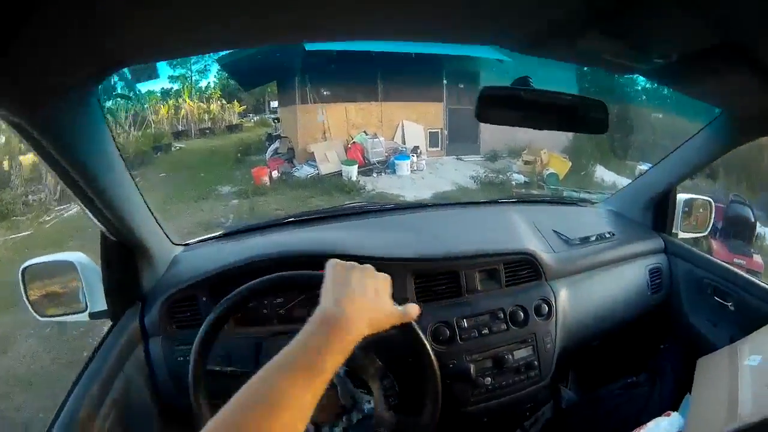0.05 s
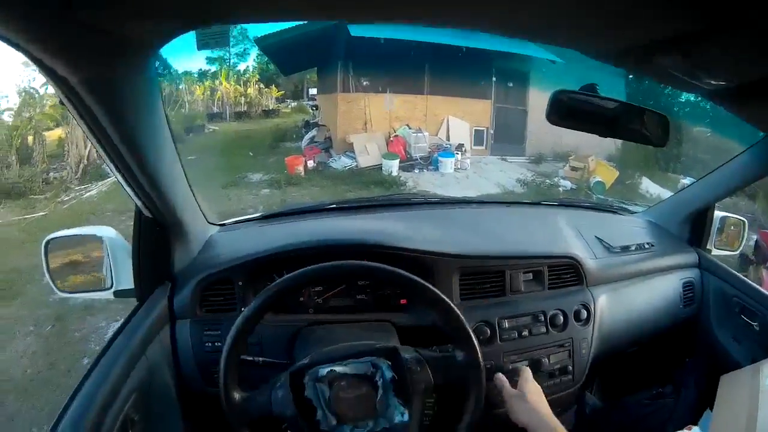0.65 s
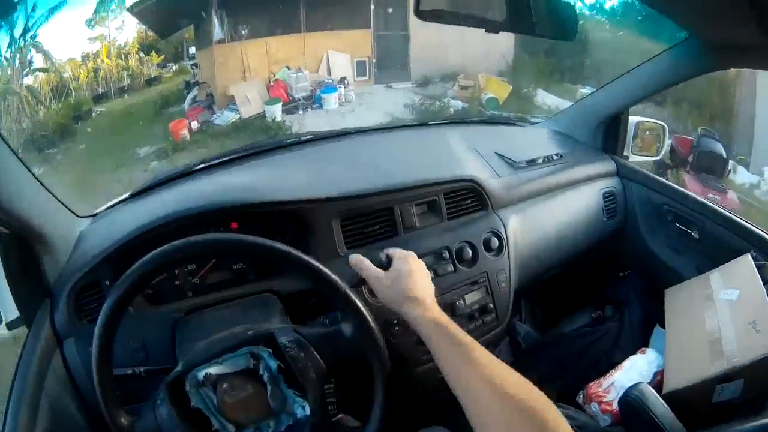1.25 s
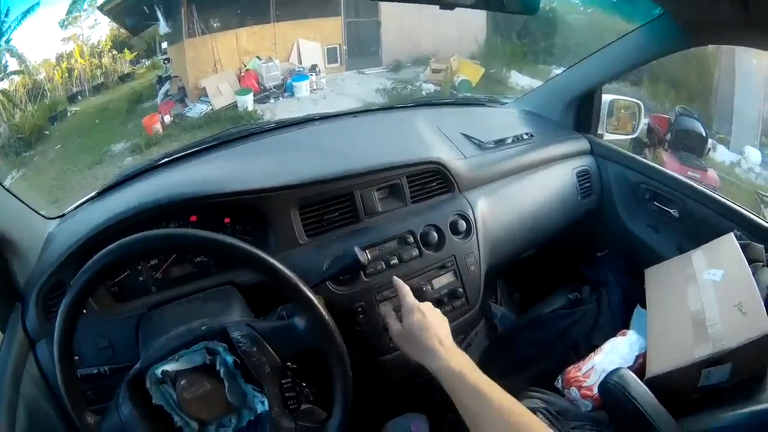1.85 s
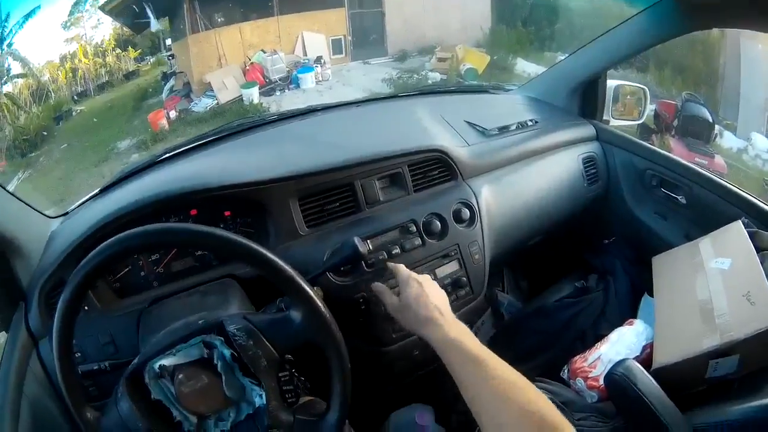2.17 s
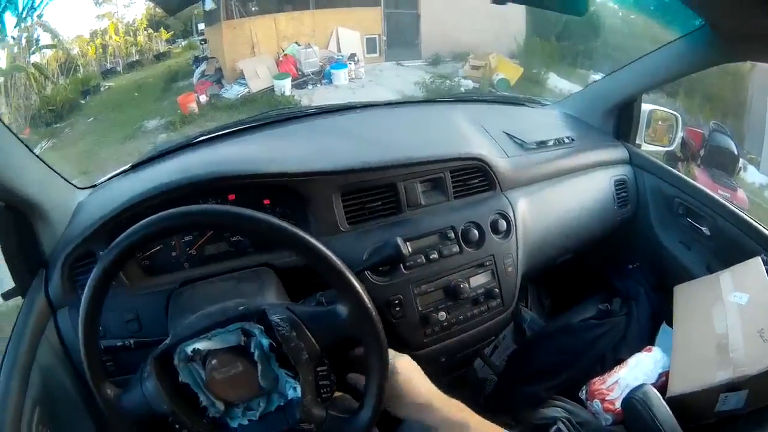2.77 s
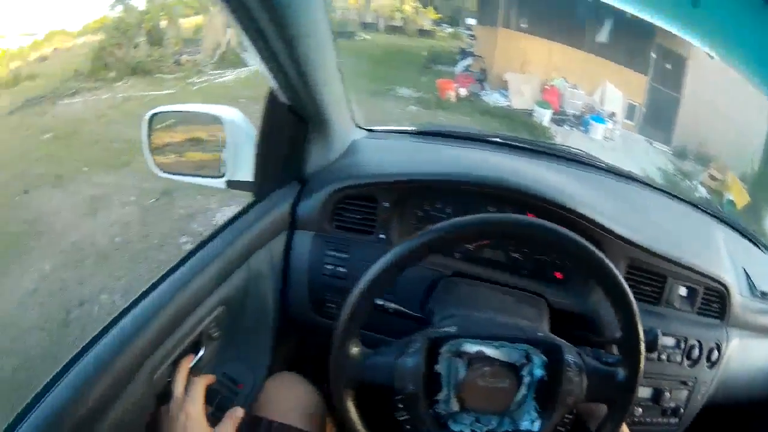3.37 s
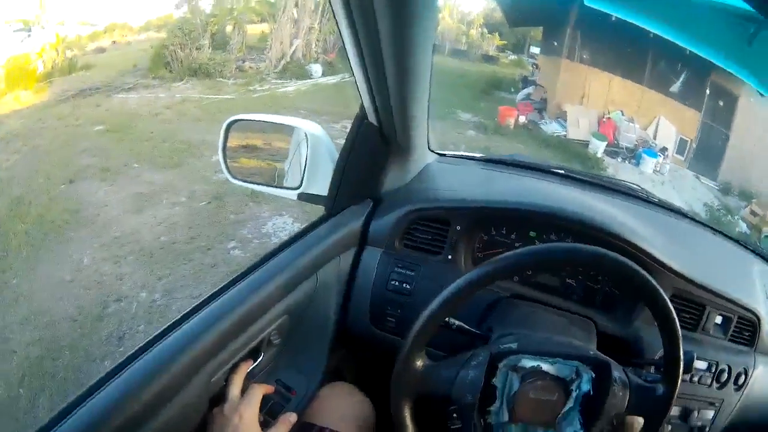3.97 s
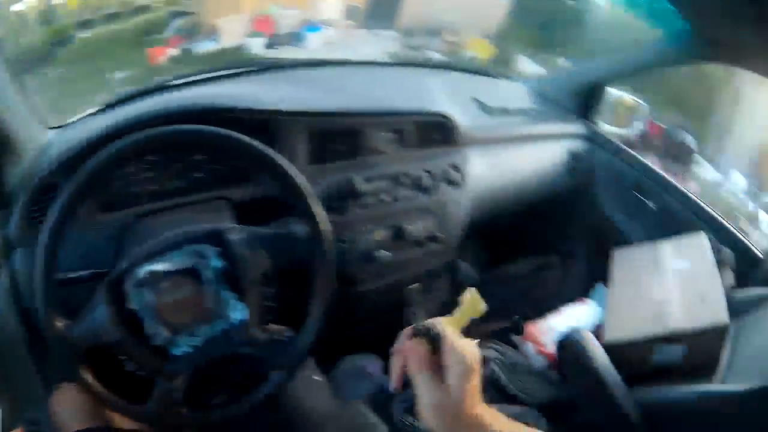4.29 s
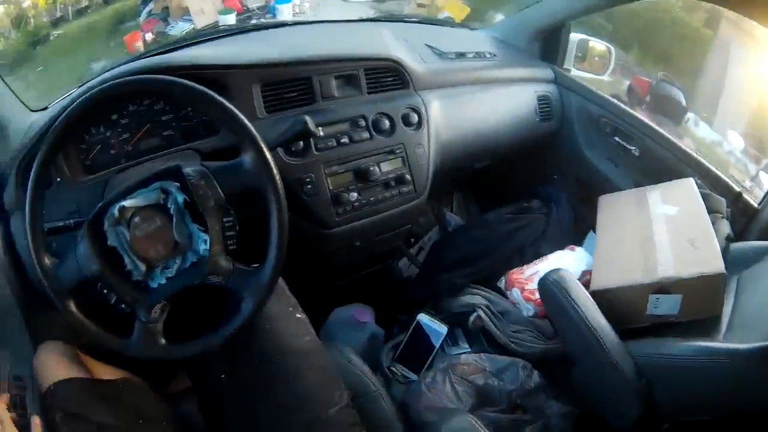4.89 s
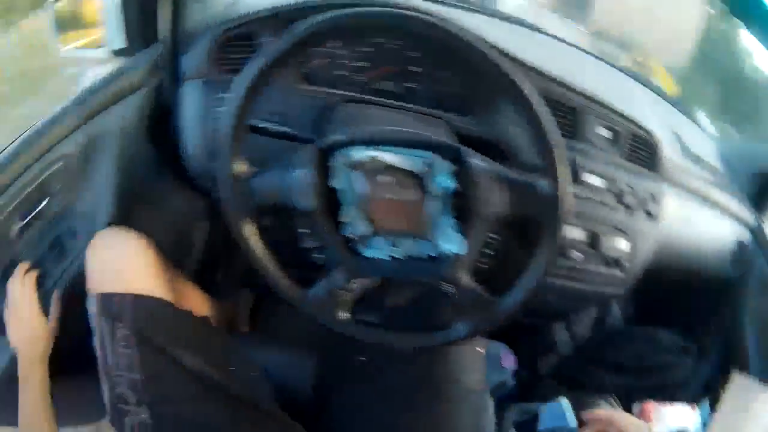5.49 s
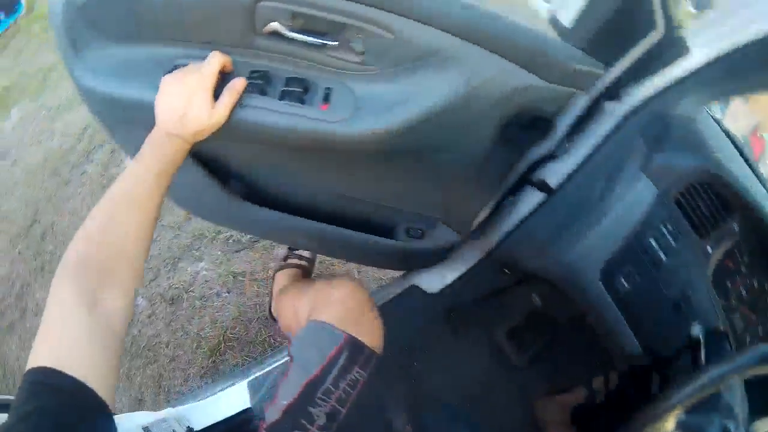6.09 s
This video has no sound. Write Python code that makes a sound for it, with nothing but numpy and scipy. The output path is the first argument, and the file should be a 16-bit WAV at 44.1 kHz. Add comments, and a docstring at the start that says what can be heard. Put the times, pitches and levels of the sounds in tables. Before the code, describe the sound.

A low engine idle and soft vent air fill a car cabin, with the microphone near the driver. The gear lever clunks through its notches, then switches click and the fan dies down. The key clicks round in the lock and the engine winds down. A bunch of keys clinks and jingles, the door latch lets go with a low thump, and clothes rustle against the seat.

```python
"""Parking and leaving a car

From the driver's seat, a six-cylinder engine booms at idle and clothes rub as the driver moves.
The gear lever clacks into park, the fan is switched off, the ignition key clicks round and the engine
shudders to a stop. Keys jangle against each other as they are pulled out, then the door unlatches
and opens. A quiet yard murmurs underneath."""
import sys
import numpy as np
from scipy import signal
from scipy.fft import rfft, irfft, next_fast_len
from scipy.io import wavfile

SR = 44100
rng = np.random.default_rng(int(sys.argv[2]) if len(sys.argv) > 2 else 0)


def log_audio(samples):
    """Write samples as a 16-bit WAV file to the path given in sys.argv[1]."""
    # one column per channel
    frames = np.atleast_2d(samples).T
    # limit to full scale, then quantise
    limited = np.clip(frames, -1, 1)
    pcm = np.round(limited * 32767).astype(np.int16)
    wavfile.write(sys.argv[1], SR, pcm)


N = 270774
TIME = np.arange(N) / SR

# Levels in all tables are relative: the code that uses them may turn them up or down.
# tone of the dashboard and door panels: pitch_hz, level_db
TRIM_TONE = [(60, -9), (200, -18.5), (330, -5), (560, -13), (900, -2), (1250, -6), (2000, 1.5),
             (3600, -19.5), (7600, -17.5), (10500, -22), (15000, -30)]
# tone of clinking keys as heard in the cabin, with a resonance near 2 kHz: pitch_hz, level_db
KEY_TONE = [(700, -31), (1300, -7), (1700, -8.5), (1970, 7.5), (2400, -9), (3100, 2), (4000, -4.5),
            (5000, 0), (7000, 1.5), (9600, -0.5), (13300, -8), (15000, -21)]


def from_db(db):
    """Turn decibels into a number to multiply by."""
    return 10 ** (np.asarray(db) / 20)


def rms_one(x):
    """Scale a sound so its average strength (rms) is 1."""
    return x / np.sqrt(np.mean(x ** 2) + 1e-20)


def add(out, start_s, sound):
    """Mix a sound in at its start time."""
    at = int(np.clip(round(start_s * SR), 0, N - 1))
    out[at:at + len(sound)] += sound[:N - at]


def band(x, low_hz, high_hz):
    """Keep the pitches between two limits."""
    return signal.sosfilt(signal.butter(2, [low_hz, high_hz], "band", fs=SR, output="sos"), x)


def colour(x, tone):
    """Make each pitch louder or softer, following a tone table."""
    size = 2 * next_fast_len(len(x) // 2 + 2048)
    hz, db = np.transpose(tone)
    grid_hz = np.maximum(np.arange(size // 2 + 1) * SR / size, 1)
    gains = from_db(np.interp(np.log(grid_hz), np.log(hz), db))
    # fold the filter so that it never rings ahead of the sound
    cepstrum = irfft(np.log(gains))
    cepstrum[1:size // 2] *= 2
    cepstrum[size // 2 + 1:] = 0
    return irfft(rfft(x, size) * np.exp(rfft(cepstrum)))[:len(x)]


def drift(per_s):
    """A random wobble of about 1 either way, changing per_s times a second."""
    knots = rng.standard_normal(4096)
    return np.interp(TIME * per_s, np.arange(len(knots)), knots)


def noise(tone, flutter_db):
    """Noise with a given tone and a fluttering level."""
    return rms_one(colour(rng.standard_normal(N), tone) * from_db(flutter_db * drift(30)))


def ring(clicks, hz, fade_s):
    """Each click starts a pure note that falls 60 dB in fade_s."""
    decay, step = from_db(-60 / (fade_s * SR)), 2 * np.pi * hz / SR
    return signal.lfilter([0, np.sin(step)], [1, -2 * decay * np.cos(step), decay ** 2], clicks + 1e-18)


def grains(per_s, spread_db):
    """Tiny random contacts of uneven size."""
    sizes = from_db(spread_db * np.minimum(rng.exponential(1, N), 3)) * rng.choice([-1, 1], N)
    return sizes * (rng.random(N) < per_s / SR)


def swells(rows, rise_s, fall_s):
    """Loudness of movements: each builds up to its start time, holds and dies away."""
    power = 0
    for start_s, length_s, db in rows:
        early = np.maximum(start_s - TIME, 0) / rise_s
        late = np.maximum(TIME - start_s - length_s, 0) / fall_s
        power += (from_db(db) * np.exp(-np.minimum(early + late, 20))) ** 2
    return np.sqrt(power)


def blows(rows, tone, gain_db, fade_s, tail_db, rough_db, rise_s):
    """Struck parts chatter, then fade in the cabin: a low thud, a middle knock and a high snap."""
    out, t = np.zeros(N), TIME[:SR // 3]
    for start_s, thud_db, knock_db, snap_db, chatter_s in rows:
        rough = from_db(rough_db * np.interp(t * 900, np.arange(512), rng.standard_normal(512)))
        dying = from_db(-60 * np.maximum(t - chatter_s, 0) / fade_s) + from_db(tail_db - 60 * t / 0.27)
        onset = 1 - np.exp(-t / rise_s)
        strike = colour(rng.standard_normal(len(t)) * rough * dying * onset, tone)
        # flipping the middle band lets the three join without a gap
        bands = [(35, 500, thud_db, 1), (500, 3000, knock_db, -1), (3000, 16000, snap_db, 1)]
        for low_hz, high_hz, db, sign in bands:
            part = sign * band(strike, low_hz, high_hz)
            add(out, start_s, from_db(db + gain_db) * part / np.linalg.norm(part) * np.sqrt(0.011 * SR))
    return out


def engine():
    """The cylinders' firing booms in the cabin; as the engine slows it rocks on its mounts."""
    # notes of the boom: multiple_of_firing_rate, level_db
    notes = [(2 / 3, 0), (4 / 3, -9.5), (2, -1.2), (3, -3), (4, -1.8)]
    # tone of the rumble: pitch_hz, level_db
    rumble_tone = [(12, -19), (25, 6.5), (55, -5), (160, -2), (200, -8.5), (400, -15), (650, -20.5),
                   (1200, -50)]
    idle_hz, mounts_hz = 39.25, 13   # firings a second at idle; rate of the last shudders
    park_s, key_off_s, standstill_s = 1.92, 3.85, 4.68
    idle_shake_db, shudder_db, in_gear_db, in_park_db = -49, -32, -42, -48
    running = np.exp(-np.maximum(TIME - key_off_s, 0) / 0.16)
    turning = np.exp(-np.maximum(TIME - standstill_s, 0) / 0.022)
    load = np.exp(-np.maximum(TIME - park_s, 0) / 0.13)   # in park the load comes off
    firing_hz = mounts_hz + (idle_hz - mounts_hz) * running
    phase = 2 * np.pi * np.cumsum(firing_hz * (1 + 0.015 * drift(14))) / SR
    boom = sum(from_db(db + 2.3 * drift(22)) * np.sin(multiple * phase + rng.uniform(0, 2 * np.pi))
               for multiple, db in notes)
    shake = np.sin(phase) + from_db(-20.5) * np.sin(2 * phase) + from_db(-22) * np.sin(4 * phase)
    rumble = noise(rumble_tone, flutter_db=4) * (1 + 0.036 * np.sin(phase))
    shake_db = shudder_db + (idle_shake_db - shudder_db) * running ** 2 + drift(12)
    rumble_db = in_park_db + (in_gear_db - in_park_db) * load
    drone = from_db(-48) * rms_one(boom) + from_db(rumble_db) * rumble
    return running * drone + turning * from_db(shake_db) * rms_one(shake)


def fan():
    """Air from the vents drops to a faint hiss once the fan is switched off."""
    # loudness of the air: time_s, level_db
    airflow = [(0, -59), (2.25, -47.5), (2.55, -62.5), (3.6, -69), (4.0, -62.5)]
    # tone of the air: pitch_hz, level_db
    air_tone = [(200, 0.5), (400, -3), (1100, -7), (1500, -6.5), (2700, -30), (4200, -35.5), (12000, -50.5)]
    time_s, level_db = np.transpose(airflow)
    return from_db(np.interp(TIME, time_s, level_db)) * noise(air_tone, flutter_db=3)


def yard():
    """A faint outdoor murmur, there all the time."""
    # tone of the yard: pitch_hz, level_db
    yard_tone = [(30, -2.5), (100, -17.5), (300, -33.5), (2000, -17.5), (3500, -33.5), (15000, -35)]
    return from_db(-59) * noise(yard_tone, flutter_db=2)


def driver():
    """Hands, clothes and seat rub in clumps of tiny slips; the seat rumbles as weight shifts."""
    # hands slide over the wheel: start_s, length_s, level_db
    strokes = [(.08, 0.11, -61), (.32, 0.13, -59.5), (.64, 0.079, -62.5)]
    # reaching for lever, key and door: start_s, length_s, rubbing_db, rumble_db
    moves = [(1.131, 0.27, -45.5, -35.5), (1.49, 0.28, -49, -38.5), (2.734, 0.3, -56, -43.5),
             (3.742, 0.15, -41, -67), (4.076, 0.02, -40.5, -50), (4.243, .3, -55, -49.5),
             (4.7, 0.34, -33.5, -47), (5.088, 0.12, -50, -61), (5.343, 0.018, -45.5, -66),
             (5.513, 0.074, -53.5, -81), (5.853, 0.22, -50.5, -62.5)]
    # tone of the sliding hands: pitch_hz, level_db
    hand_tone = [(400, -24), (700, -4), (1960, -0.5), (3060, -13.5), (4800, -15), (9500, -21.5),
                 (15000, -33)]
    # tone of clothes on the seat: pitch_hz, level_db
    seat_tone = [(60, -2.5), (300, -13), (900, -11), (1800, -6.5), (2700, -16), (4500, -22.5),
                 (10000, -32.5)]
    # tone of seat and floor under the body: pitch_hz, level_db
    weight_tone = [(15, -3), (28, 4.5), (60, -3), (130, -4.5), (190, -10), (400, -14.5), (650, -17.5),
                   (1200, -48)]
    slips = grains(per_s=5000, spread_db=3) * from_db(2 * drift(70))
    hands = from_db(8.5) * swells(strokes, rise_s=0.23, fall_s=0.023) * rms_one(colour(slips, hand_tone))
    rise_s, fall_s = 0.052, 0.047
    rubbing = swells([(start, length, db) for start, length, db, _ in moves], rise_s, fall_s)
    weight = swells([(start, length, db) for start, length, _, db in moves], rise_s, fall_s)
    return hands + rubbing * rms_one(colour(slips, seat_tone)) + weight * noise(weight_tone, flutter_db=1)


def dashboard():
    """The controls clack, and one button gives a single short tick."""
    # clacks of the controls: start_s, thud_db, knock_db, snap_db, chatter_s
    switches = [(.515, -55, -48.5, -47.5, .012), (1.743, -46, -109, -38, 0.0025),
                (2.235, -41.5, -47.5, -43.5, 0.0044), (2.33, -50, -47.5, -59, 0.013),
                (2.86, -41, -58, -37, 0.012), (2.919, -46, -72, -46.5, 0.0048),
                (2.971, -25.5, -30.5, -30.5, 0.0073), (3.101, -53, -59, -50.5, .01),
                (3.222, -49, -51.5, -58, 0.0086)]
    press = np.zeros(N)
    add(press, 0.7793, [1.0])
    tick = from_db(-17.5) * ring(press, hz=2330, fade_s=0.0094)
    tick -= from_db(-18.5) * ring(press, hz=1630, fade_s=0.0077)
    clacks = blows(switches, TRIM_TONE, gain_db=-2, fade_s=0.096, tail_db=-33, rough_db=-3, rise_s=0.0009)
    return clacks + cabin(tick, echo_db=-11, fade_s=0.089)


def cabin(x, echo_db, fade_s):
    """Nearby glass and panels add many echoes that die quickly."""
    t = TIME[:SR // 4]
    echoes = rng.standard_normal(len(t)) * from_db(-60 * t / fade_s) * (t > 0.001)
    return x + from_db(echo_db) * signal.fftconvolve(x, echoes / np.linalg.norm(echoes))[:N]


def gear_change():
    """The lever squeaks and drops through its notches; the car rocks as the drive lets go."""
    # the lever hits each notch: start_s, thud_db, knock_db, snap_db, chatter_s
    notches = [(1.295, -20.5, -23.5, -23.5, 0.013), (1.343, -24.5, -18.5, -23.5, 0.015),
               (1.39, -31, -35, -51, .0049), (1.427, -33, -17.5, -19.5, 0.016),
               (1.437, -20.5, -21.5, -30, 0.024), (1.608, -33, -26.5, -40, 0.0039),
               (1.642, -33.5, -32, -44.5, 0.0093)]
    # tone of the lever's housing: pitch_hz, level_db
    housing = [(41, -7), (70, -3), (150, 0.5), (215, -10), (275, 2.5), (578, -4.5), (632, 2), (740, -3),
               (1590, -2.5), (2080, -2), (3810, -21), (7650, -18), (10500, -22.5), (15000, -43)]
    # the car's body rocks: start_s, length_s, level_db
    rocks = [(1.13, 0.05, -27), (1.5, 0.3, -31)]
    squeak_hz = np.interp(TIME, [1.11, 1.17], [835, 875]) * (1 + 0.053 * drift(250))
    pressure = np.interp(TIME, [1.10, 1.118, 1.15, 1.172], [0.015, 0.63, 0.46, 0.0044])
    pressure *= from_db(2 * drift(250))
    squeak = from_db(-27.5) * pressure * np.sin(2 * np.pi * np.cumsum(squeak_hz) / SR)
    rock_hz = 19 + 4 * drift(16)
    rocking = swells(rocks, rise_s=0.05, fall_s=0.059) * np.sin(2 * np.pi * np.cumsum(rock_hz) / SR)
    clacks = blows(notches, housing, gain_db=-4.5, fade_s=0.061, tail_db=-15, rough_db=0.5, rise_s=0.0008)
    return squeak + rocking + clacks


def key_touch():
    """Two keys meet: a clack and a short ring, muffled by the hand and never quite alike."""
    # notes a key rings at: pitch_hz, level_db
    notes = [(4800, 7.5), (5800, -17), (7090, 8.5), (8400, -1.5), (9180, 5.5), (9620, 9.5), (10400, 3),
             (12200, 10.5), (13000, 3.5)]
    t = TIME[:SR // 8]
    picked = np.array(notes)[rng.choice(len(notes), size=8)]
    hz, db = picked.T[:, :, None]
    hz = hz * rng.uniform(0.93, 1.07, hz.shape)
    fade_s = rng.uniform(0.025, 0.1, hz.shape)
    rings = np.sum(from_db(db - 60 * t / fade_s) * np.sin(2 * np.pi * hz * t), axis=0)
    clack = colour(rng.standard_normal(len(t)) * from_db(-60 * t / 0.052), KEY_TONE)
    return (clack + from_db(-12.5) * rings) * (1 - np.exp(-t / 0.0025))


def keys():
    """Keys slide over one another, tick as they are shaken and now and then clink hard."""
    # shakes of the bunch: start_s, length_s, level_db
    shakes = [(3.555, .01, -61.5), (3.62, 0.0092, -57.5), (3.8, 0.087, -40), (3.99, 0.052, -49),
              (4.06, 0.013, -38), (4.17, 0.024, -41.5), (4.24, 0.01, -39.5), (4.32, .01, -47),
              (4.39, 0.073, -39), (4.515, 0.017, -38), (4.62, 0.33, -39.5), (5.13, 0.031, -44),
              (5.29, 0.081, -41.5), (5.46, 0.0095, -54.5), (5.535, 0.019, -49.5), (5.61, 0.016, -54),
              (5.72, 0.0077, -54), (5.84, 0.13, -34.5), (6.03, 0.054, -37)]
    # the hardest clinks: start_s, level_db
    clinks = [(1.1834, -28), (1.884, -51.5), (3.702, -33), (3.9843, -27.5), (4.3773, -26), (4.397, -21),
              (4.4053, -14), (4.5923, -25.5), (4.6113, -17), (4.6906, -23), (4.7224, -20.5), (4.7453, -23),
              (4.801, -21), (4.8569, -26.5), (4.9222, -25.5), (5.1267, -30), (5.2851, -32), (5.787, -35),
              (5.8297, -34), (5.8572, -26.5), (5.9207, -24), (5.9405, -19), (6.0642, -38)]
    touches_per_s, grabbed_s = 110, 3.5
    shaking = swells(shakes, rise_s=0.02, fall_s=0.03)
    sliding = colour(grains(per_s=1500, spread_db=5), KEY_TONE) * from_db(3 * drift(60))
    out = from_db(-6) * shaking * rms_one(sliding)
    for at in np.flatnonzero((rng.random(N) < touches_per_s / SR) & (TIME > grabbed_s)):
        add(out, at / SR, from_db(3.5 + 5.2 * rng.uniform(-1.5, 1)) * shaking[at] * key_touch())
    for start_s, db in clinks:
        add(out, start_s, from_db(db - 2.5) * key_touch())
    return out


def panel_bumps():
    """The cabin's panels give dull knocks when bumped."""
    # the bumps: start_s, thud_db, knock_db, snap_db, chatter_s
    bumps = [(2.774, -26.5, -46, -49.5, .0083), (2.862, -30.5, -51, -48, 0.031),
             (4.762, -16.5, -24.5, -44, .016), (6.091, -40, -29.5, -74, 0.004)]
    # tone of a bumped panel: pitch_hz, level_db
    panel_tone = [(40, 17.5), (130, 10), (190, 1.5), (270, 7.5), (550, -1), (2000, -14.5), (4600, -30),
                  (12000, -31)]
    return blows(bumps, panel_tone, gain_db=0, fade_s=0.09, tail_db=-6.5, rough_db=-1.5, rise_s=0.001)


def ignition():
    """The lock clicks as the key turns it."""
    # clicks of the lock: start_s, thud_db, knock_db, snap_db, chatter_s
    clicks = [(3.733, -42, -20, -14.5, .0059), (3.858, -29, -18.5, -12, 0.0065),
              (4.108, -30.5, -21.5, -14, 0.0069)]
    # tone of the lock: pitch_hz, level_db
    lock_tone = [(120, -78), (200, -10.5), (298, -24), (485, -12), (896, -10), (1130, -0.5), (1330, -5.5),
                 (2020, 7.5), (2510, -7.5), (3470, -9.5), (5170, -6), (5660, -7.5), (8260, -4.5),
                 (12700, -14.5), (15000, -31)]
    return blows(clicks, lock_tone, gain_db=-1.5, fade_s=0.063, tail_db=-28.5, rough_db=-3, rise_s=0.0034)


def door():
    """The latch lets go and the seal releases a low puff of air."""
    # clacks of handle and latch: start_s, thud_db, knock_db, snap_db, chatter_s
    clacks = [(4.654, -34, -34, -55, 0.011), (4.796, -36, -22, -44, 0.0068),
              (4.935, -22, -25.5, -63, 0.013), (5.010, -37, -29, -24, 0.015),
              (5.0285, -21.5, -20.5, -28, 0.0091), (5.836, -54, -41.5, -30.5, 0.00098),
              (5.922, -69, -45, -32, 0.012), (6.06, -40.5, -46, -48, 0.0028),
              (6.075, -50, -44, -41.5, 0.0049)]
    puff, t = np.zeros(N), TIME[:SR // 4]
    add(puff, 4.755, -from_db(-18.5) * np.sin(2 * np.pi * 32 * t) * np.exp(-t / 0.06))
    latch = blows(clacks, TRIM_TONE, gain_db=-1.2, fade_s=0.022, tail_db=-11.5, rough_db=3, rise_s=0.00096)
    return puff + latch


def scene():
    """Everything the driver hears, in one channel."""
    background = engine() + fan() + yard()
    actions = driver() + dashboard() + gear_change() + keys() + panel_bumps() + ignition() + door()
    return (background + actions)[None]


def record(dry):
    """Round off the loudest peaks and cut the highest treble."""
    cutoff_hz = 14700
    rounded = 0.9 * np.tanh(dry / 0.9)
    return signal.sosfilt(signal.ellip(10, 0.3, 90, cutoff_hz, fs=SR, output="sos"), rounded)


dry = scene()
out = record(dry)
log_audio(out)
```